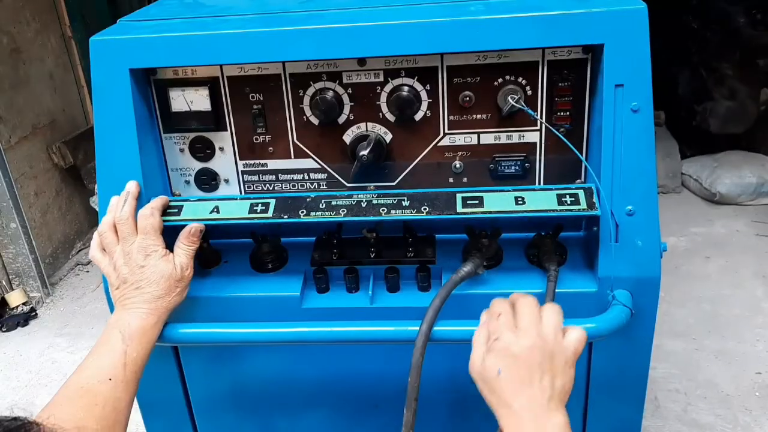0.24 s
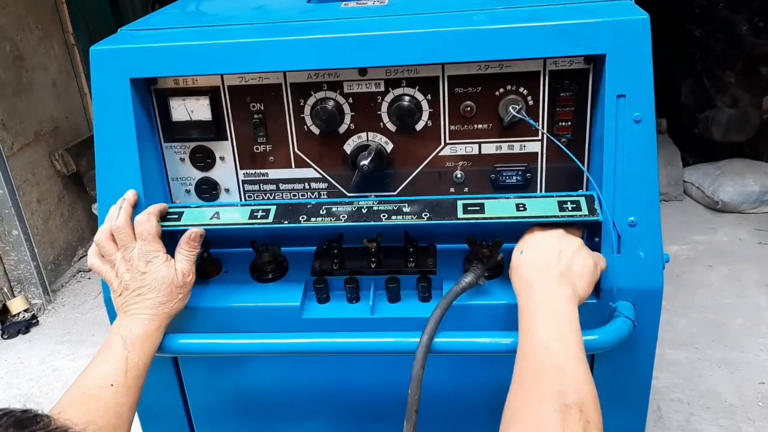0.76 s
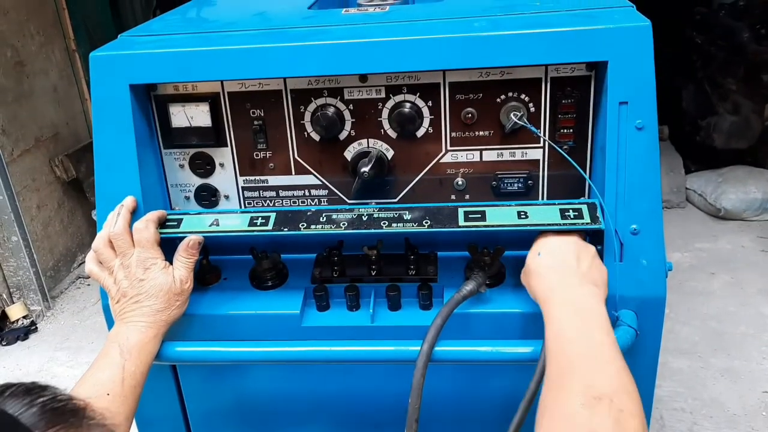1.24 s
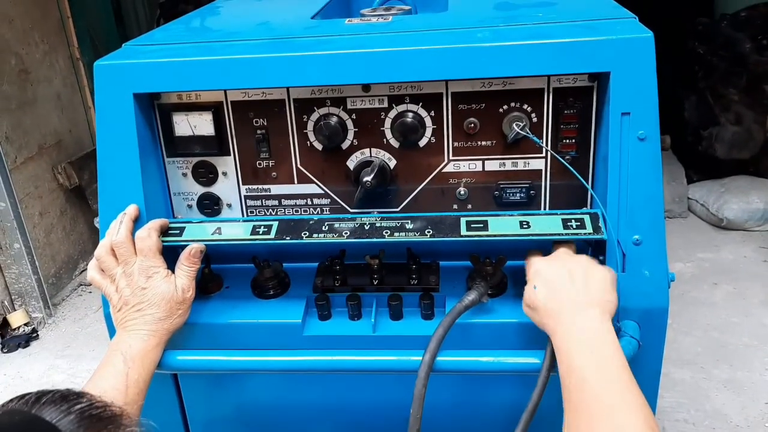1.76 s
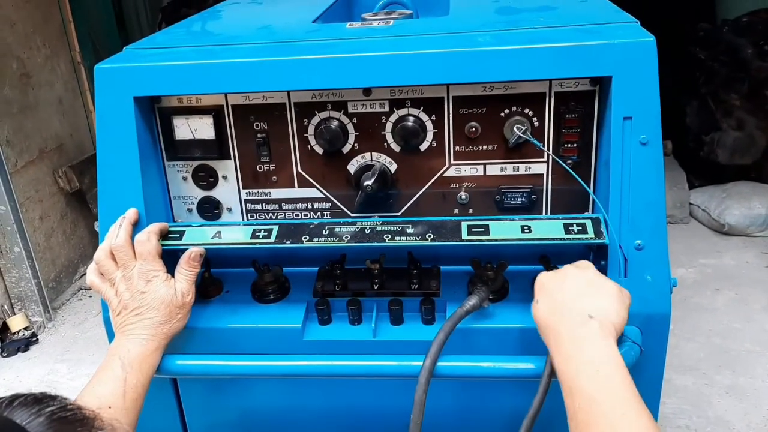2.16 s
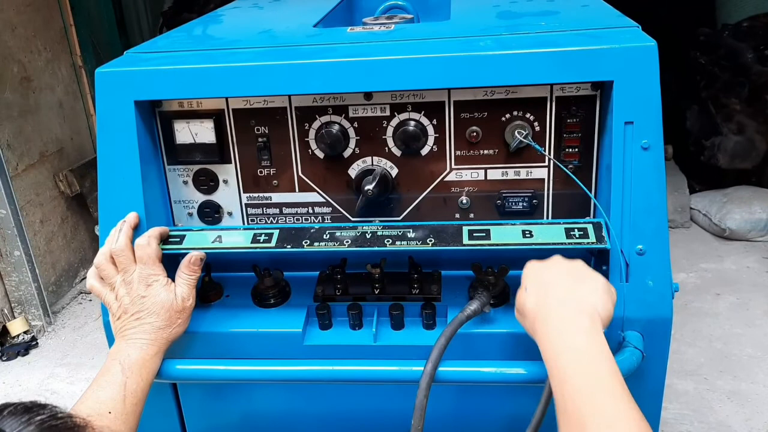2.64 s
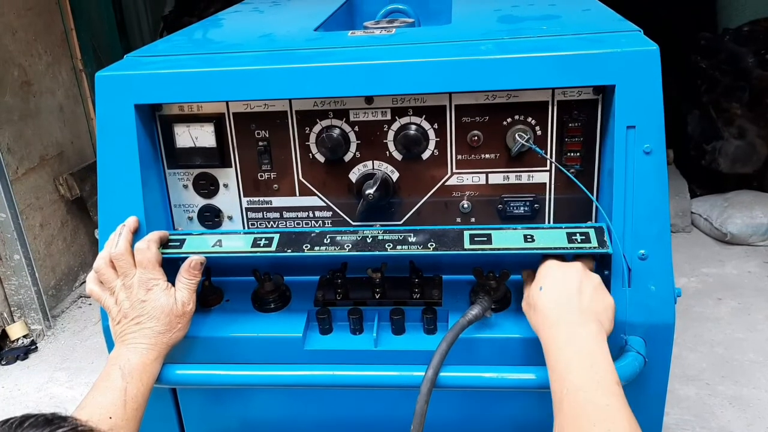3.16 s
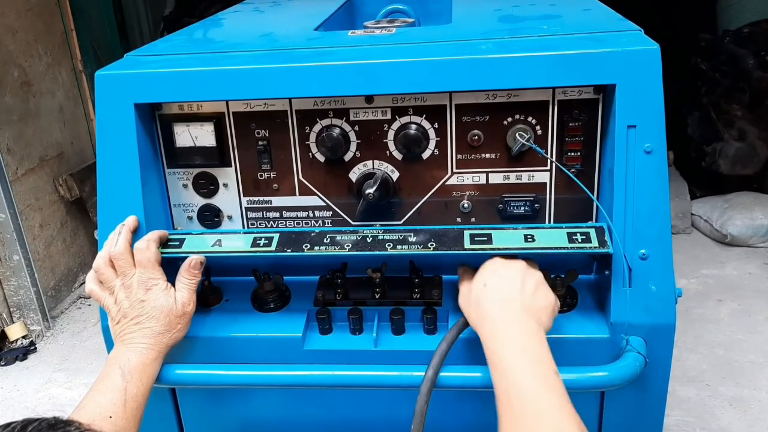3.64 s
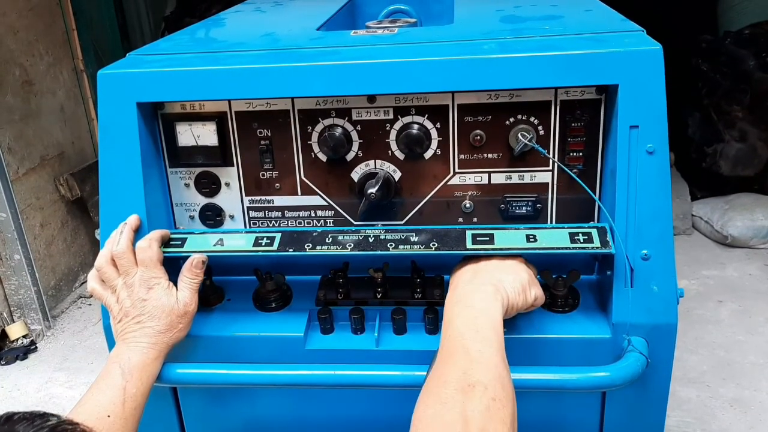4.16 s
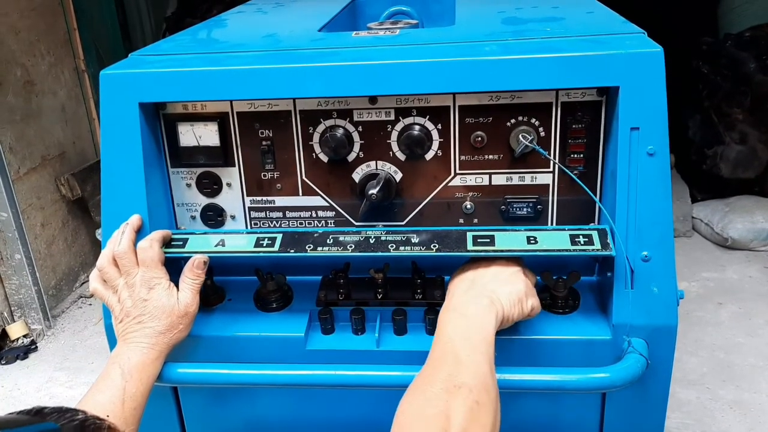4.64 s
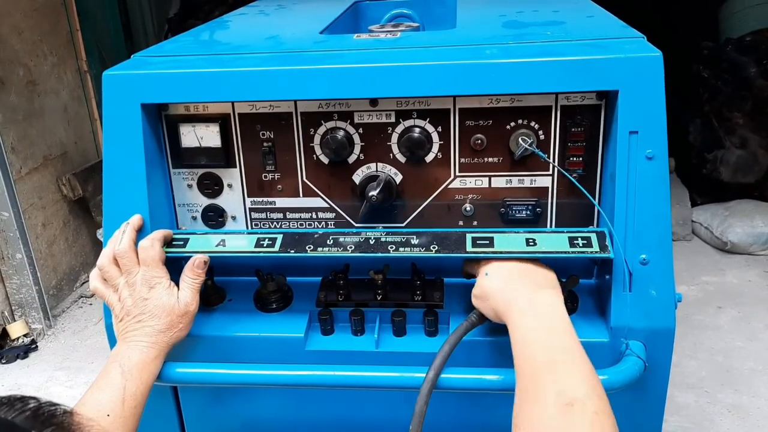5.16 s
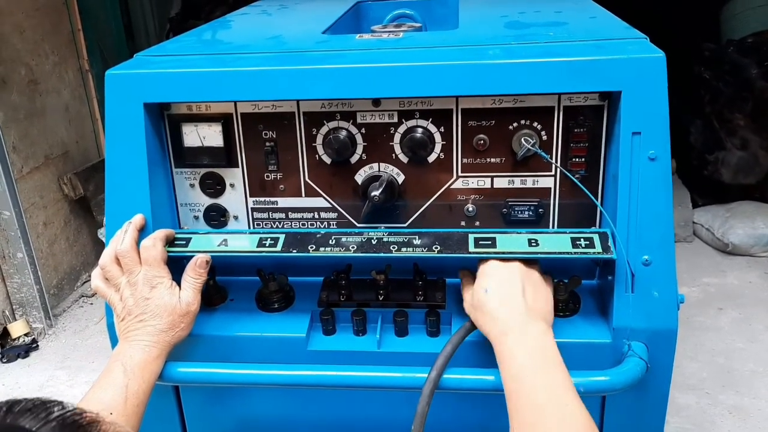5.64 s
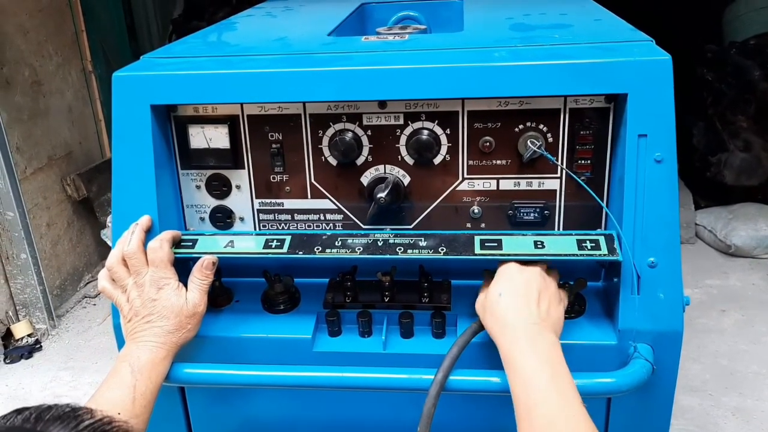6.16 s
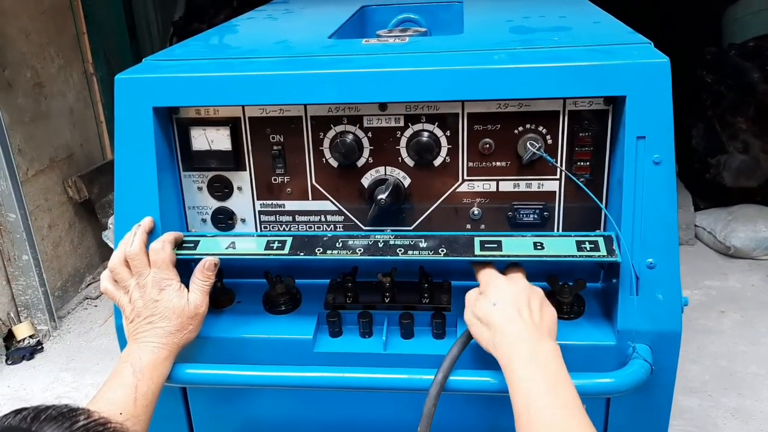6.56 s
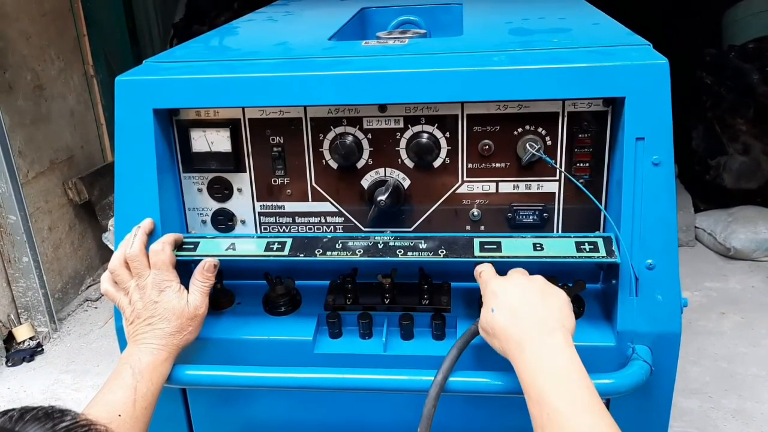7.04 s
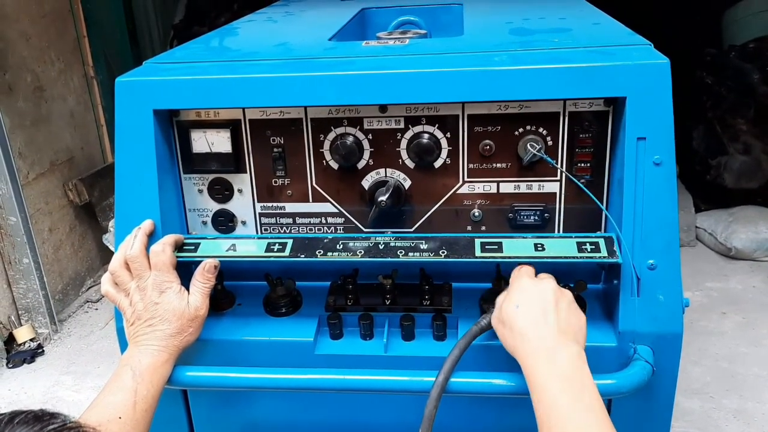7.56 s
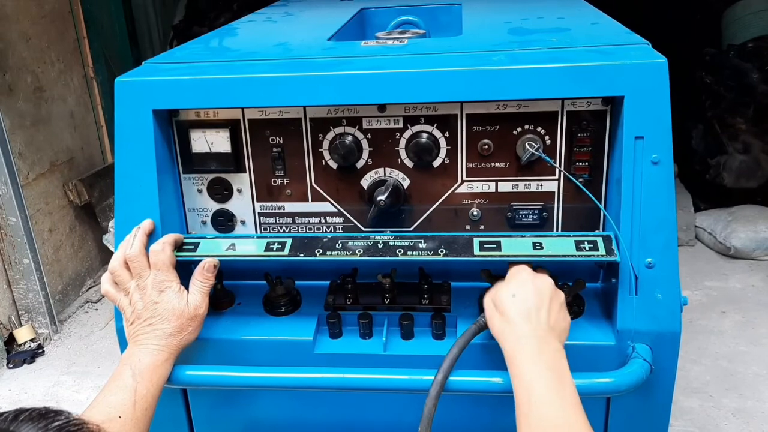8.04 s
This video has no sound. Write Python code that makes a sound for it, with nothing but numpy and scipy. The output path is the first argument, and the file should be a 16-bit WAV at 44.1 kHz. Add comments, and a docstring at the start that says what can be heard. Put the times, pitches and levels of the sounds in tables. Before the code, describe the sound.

A small three-cylinder diesel generator runs very close to a stereo microphone outdoors on a paved yard. It settles to its set speed within the first second, then holds an even drone with low rumble, fan hum, thin gear and alternator whines, busy knocking clatter and airy hiss. Short gritty scrapes and taps of cable terminals come and go, mostly after three seconds, and two soft low bumps touch the microphone past six.

```python
"""A three-cylinder diesel welder-generator runs close by from the start, reaching its governed speed in a second.
Sines on the engine's orders make the drone, fan hum and two whines; the alternator's swells at housing resonances.
Shaped noise makes rumble and airy hiss; cycle-locked vibration and knocks make panel noise and clatter.
The housing booms now and then; from 0.66 s a hand scrapes and taps the cable terminals in gritty noise bursts.
Past 6 s two soft low tones bump the microphone."""
import sys
import numpy as np
from scipy import signal
from scipy.fft import rfft, irfft
from scipy.io import wavfile

SR = 44100
rng = np.random.default_rng(int(sys.argv[2]) if len(sys.argv) > 2 else 0)


def wav_record(signal):
    """Record a signal, one row per channel, as 16-bit PCM in the file named by sys.argv[1]."""
    frames = np.transpose(np.atleast_2d(signal))
    bounded = np.clip(frames, -1, 1)
    # unit amplitude maps onto the largest positive 16-bit level
    quanta = np.round(bounded * 32767).astype(np.int16)
    wavfile.write(sys.argv[1], SR, quanta)


N = 366030
TIME = np.arange(N) / SR
FREQS = np.fft.rfftfreq(N, 1 / SR)
LEFT_LEAD_S = .00009  # the left channel hears the machine sooner


def amp(db):
    """Decibels to gain."""
    return 10 ** (np.asarray(db) / 20)


def unit(x):
    """Scales to rms 1."""
    return x / np.sqrt(np.mean(x ** 2) + 1e-20)


def read(points):
    """A curve at every frequency, joined on a log axis."""
    hz, value = np.transpose(points)
    return np.interp(np.log(FREQS + 1), np.log(hz + 1), value)


def pan(db):
    """Left and right gains for a level difference."""
    return amp(np.array([[.5], [-.5]]) * db) / np.sqrt((amp(db) ** 2 + amp(-db) ** 2) / 2)


def wander(rate_hz):
    """Slow random signal of rms about 1."""
    grid = np.linspace(0, TIME[-1], 2048)
    hz = np.fft.rfftfreq(len(grid), grid[1])
    lowpass = 1 / (1 + (hz / rate_hz) ** 2)
    slow = irfft(rfft(rng.standard_normal(len(grid))) * lowpass)
    return np.interp(TIME, grid, unit(slow))


def humps(rows):
    """Smooth rises and falls from rows of time, height and half length."""
    return sum(height * np.exp(-((TIME - s) / length) ** 2) for s, height, length in rows)


def peaks(modes, hz):
    """The dB that a table of modes adds at each frequency."""
    return sum(db / (1 + ((hz - f) / width) ** 2) for f, width, db in modes)


# Likeness of the two channels. Each row: frequency in Hz, correlation -1 to 1.
LIKENESS_HZ = [(50, .4), (120, .6), (170, .95), (250, 1.0), (500, .6), (800, .7), (1200, -.14), (2500, .12),
               (5000, .11), (15000, 0)]
# Balance of the two channels. Each row: frequency in Hz, left minus right in dB.
SIDES_HZ_DB = [(60, -5.5), (110, -5), (160, 1), (270, -0.6), (450, 3), (740, 10), (1220, 0), (1700, 4),
               (2050, -6), (2550, -2.5), (3000, -2), (3400, 0), (5500, 0), (9000, 7), (15000, 0)]


def colour(drive, gain):
    """Gives two white signals a spectrum and spreads them over the two microphones."""
    a, b = rfft(drive)
    same = np.clip(read(LIKENESS_HZ), -1, 1)
    mid = a * np.sqrt((1 + same) / 2)
    side = b * np.sqrt((1 - same) / 2)
    left = (mid + side) * np.exp(2j * np.pi * FREQS * LEFT_LEAD_S)
    channels = np.array([left, mid - side])
    return irfft(channels * gain * pan(read(SIDES_HZ_DB)), N) * np.sqrt(SR / 2)


# four-stroke cycles per second: set speed, and shortfall at the start
GOVERNED_HZ, START_SHORT_HZ, RUN_UP_S = 16.4764, .682, .9755


def run_up():
    """The speed-up still to come: 1 at the start, falling evenly to 0 after the run-up."""
    return np.maximum(1 - TIME / RUN_UP_S, 0)


# Brief drifts of the speed. Each row: centre in seconds, change in cycles per second, half length in seconds.
DRIFTS_HZ = [(1.204, -.061, .293), (1.85, .018, .15), (3.4, -.016, .15), (3.8, .02, .18), (4.3, -.025, .15),
             (4.8, .012, .15), (5.25, -.022, .18), (5.75, .008, .22), (6.3, -.035, .2), (7.62, .03, .18),
             (8.18, -.06, .17)]


def governor(tremble=0.00049):
    """Cycles per second: the speed climbs to its setting, then drifts and trembles around it."""
    steady = GOVERNED_HZ - START_SHORT_HZ * run_up() ** 2 + humps(DRIFTS_HZ)
    return steady * (1 + tremble * wander(11.3))


# Sharp housing resonances. Each row: centre in Hz, half width in Hz, gain at the centre in dB.
HOUSING_MODES = [(495, 8, 7), (721, 14, 5), (754, 13, 5.3), (824, 9, 4.5), (903, 10, 10), (1218, 14, 3),
                 (1890, 8, 4), (1914, 6, 7.5)]


def resonance_db(order, speed):
    """An engine order swells while its pitch lies on a housing resonance."""
    near = [row for row in HOUSING_MODES if abs(order * GOVERNED_HZ - row[0]) < 50]
    return sum(db * np.exp(-((order * speed - hz) / width) ** 2) for hz, width, db in near)


# Strong engine orders. Each row: multiple of the cycle rate, relative level in dB, left minus right in dB.
DRONE_ORDERS = [(3, -35, 1), (4, -49, 0), (6, -26, 1.3), (8, -51, 3), (9, -42, 2), (10, -42, 1),
                (11, -40, 2), (12, -44, 1), (13, -43, 1), (15, -37, 3), (16, -37, 2), (17, -42, 1),
                (18, -37.3, 1), (19, -38.7, 0), (20, -41, 1), (21, -32.5, 6), (22, -36.3, 2), (23, -41, -4),
                (24, -35, 3), (25, -36.5, 3), (26, -41, 5), (27, -43, 5), (28, -46, 3), (29, -44, 2),
                (30, -49, 5), (31, -45, 0), (32, -41, 5), (33, -63, -4), (34, -45, 9), (35, -40.5, 6),
                (36, -50, 3), (37, -36, 4), (38, -53, 8), (39, -60, 12), (40, -46, 6), (41, -49, 4),
                (42, -49, 2), (43, -52, 3), (44, -44, 5), (45, -48, 8), (46, -48.7, 4), (47, -49, 4),
                (48, -52, 9), (49, -55, -12), (50, -49, 2), (51, -50, -3), (52, -61, 3), (53, -54, 1),
                (54, -52, 12), (55, -67, 12), (56, -52, -1), (57, -60, -8), (58, -60, -3), (60, -54, 0),
                (62, -57, 1), (64, -55, -7), (70, -57, 0), (75, -57, 1), (76, -52, 5), (78, -58, -3),
                (81, -58, 0), (91, -59, 4), (93, -58, 4), (96, -60, 0), (121, -54, -10), (129, -56, 0),
                (135, -54, -10)]


def drone(turns, speed, unsteady=0.078, firing_unsteady=0.012, fuel_db=3.5, body_db=-0.42, slow_db=1):
    """Sine engine orders: the lowest are steadiest and grow with fuel, the rest swell at resonances."""
    out = np.zeros((2, N))
    fuel = amp(fuel_db * run_up())
    slow_loss_db = slow_db * run_up()
    lead_turns = np.array([[LEFT_LEAD_S], [0]]) * GOVERNED_HZ
    angle = 2 * np.pi * ((turns + lead_turns) % 1).astype(np.float32)
    for k, db, side_db in DRONE_ORDERS:
        if k < 7:
            level = fuel * (1 + firing_unsteady * wander(6))
        else:
            body = amp(body_db - slow_loss_db + resonance_db(k, speed))
            level = body * (1 + unsteady * wander(4))
        # muffler and housing delay each order differently: firings smear into an even drone
        lag_rad = .29 * np.pi * k ** 2
        out += pan(side_db) * amp(db) * level * np.sqrt(2) * np.sin(k * angle - lag_rad)
    return out


def fan(turns, order=12.27, level_db=-27):
    """The belt-driven fan hums off the engine's whole orders, its phase and level wandering."""
    phase_rad = 0.25 * wander(0.73)
    hum = np.sin(order * 2 * np.pi * turns + phase_rad)
    return amp(level_db) * (1 + 0.025 * wander(10)) * hum * pan(0.29)


# Gear standing wave shifting across the microphones. Each row: time in seconds, level in dB,
# left minus right in dB, phase of left against right in rad.
GEAR_WAVE_S = [(.2, -39, 3, 1.5), (.42, -46, 1, 3.1), (.8, -41, 4, 3.6), (1.3, -41, 9, 3.8),
               (1.7, -38, 0, 3.4), (2.1, -40, -3, 3.6), (2.6, -38, 1, 3.35), (3.6, -38, 0, 3.4),
               (4.3, -41, 1, 3.3), (4.7, -39, -3, 3.7), (5.2, -40, 2, 3.3), (5.6, -37, -3, 3.7),
               (6.3, -37, 3, 2.9), (7.1, -39, 0, 3), (7.5, -38, -8, 3.5), (7.8, -38, -4, 3.7),
               (8.2, -38, 6, 2.9)]


def gear_whine(turns, order=68):
    """Gears whine on an engine order; level, balance and phase follow the standing wave."""
    s, *columns = np.transpose(GEAR_WAVE_S)
    db, side_db, apart_rad = (np.interp(TIME, s, column) for column in columns)
    angle = order * 2 * np.pi * turns
    return amp(db) * pan(side_db) * np.array([np.sin(angle + apart_rad), np.sin(angle)])


def alternator_whine(turns, speed, order=116, base_db=-50, slow_db_per_hz=10, waver_db=1.4):
    """An engine order grows with speed, swells where its pitch meets a resonance, and wavers."""
    level_db = base_db + resonance_db(order, speed) - slow_db_per_hz * (GOVERNED_HZ - speed)
    tone = np.sin(order * 2 * np.pi * turns + 0.24 * wander(2.9))
    return amp(level_db + waver_db * wander(2.1)) * tone


def repeating(turns, orders=512, size=16384):
    """A white vibration that recurs every cycle: random-phase weak orders between the strong ones."""
    lines = np.exp(2j * np.pi * rng.random((2, orders)))
    lines[:, [row[0] for row in DRONE_ORDERS]] = 0
    pattern = unit(irfft(lines, size)) * np.sqrt(orders * GOVERNED_HZ / (SR / 2))
    return np.array([np.interp(turns % 1 * size, np.arange(size), p) for p in pattern])


# The panels' answer to each engine cycle. Each row: frequency in Hz, level in dB per Hz.
PANELS_HZ_DB = [(120, -74), (550, -58), (850, -69.5), (1250, -81.5), (1420, -99), (1550, -67.5),
                (2000, -113), (3000, -102)]


def panels(turns):
    """Housing panels shake alike in every engine cycle."""
    return colour(repeating(turns), amp(read(PANELS_HZ_DB)))


# Cooling air and exhaust turbulence. Each row: frequency in Hz, relative density in dB.
RUMBLE_HZ_DB = [(28, -80), (62, -59.5), (110, -58.5), (132, -61), (188, -53.5), (232, -55.5), (278, -56),
                (318, -47), (362, -54), (412, -55), (470, -66.5), (580, -62.5), (665, -59), (780, -68),
                (900, -74.5), (1440, -74.5), (3000, -101)]
# Air resonances of the housing. Each row: centre in Hz, half width in Hz, relative density in dB.
CAVITY_HZ_DB = [(147.8, 1.9, -41.5), (170.6, 5.9, -43)]
# Brief swells of the rumble. Each row: centre in seconds, rise in dB, half length in seconds.
SWELLS_S_DB = [(.1, 0.5, 0.18), (.38, 2, 0.13), (1.9, 1.5, 0.95), (4.25, 2.2, 0.62)]


def rumble(turns, throb=0.12, crank_throb=0.32, level_db=1):
    """Turbulence, pulsed by three firings and two crank turns a cycle, booms in the housing."""
    gain = amp(read(RUMBLE_HZ_DB))
    for hz, width, db in CAVITY_HZ_DB:
        gain = np.hypot(gain, amp(db) / (1 + ((FREQS - hz) / width) ** 2))
    firing = np.cos(2 * np.pi * 3 * turns)
    crank = np.cos(2 * np.pi * 2 * turns)
    pulse = 1 + throb * firing + crank_throb * crank
    turbulence = unit(rng.standard_normal((2, N)) * pulse)
    return colour(turbulence, gain) * amp(level_db + humps(SWELLS_S_DB))


# Injector and valve knocks. Each row: place in the cycle 0-1, relative force in dB, ringing pitch in Hz.
KNOCKS_CYCLE = [(.045, 1, 2000), (.07, -1, 2700), (.195, 2, 2000), (.24, 1, 2700), (.27, 1, 2450),
                (.3, 1, 2750), (.33, 0, 2500), (.36, 1, 2600), (.53, 0, 2200), (.59, 2.5, 2300),
                (.63, 2, 2100), (.675, 2.5, 2700), (.725, -1, 2600), (.77, -1, 1950), (.805, -1, 2000),
                (.915, -2, 2500), (.985, 4.5, 2300)]
# The block's answer to a knock. Each row: frequency in Hz, relative response in dB.
BLOCK_HZ_DB = [(300, -65.5), (900, -64.5), (1400, -81), (1750, -72.5), (2000, -67.5), (2300, -70.5),
               (2600, -68), (2850, -71.5), (3200, -76.5), (4000, -87), (7000, -99), (15000, -106)]
# The block's sharper modes. Each row: centre in Hz, half width in Hz, added dB.
BLOCK_MODES_HZ = [(1994, 7.5, 7.5), (2106, 17, 4), (2255, 13, 3), (2272, 15, 7.5), (2363, 21, -0.5),
                  (2490, 25, 2.5), (2586, 9.4, 8), (2747, 12, 4), (3010, 17, 8), (3096, 18, 4)]
# Moments of harder clatter. Each row: centre in seconds, rise in dB, half length in seconds.
HARDER_S_DB = [(1.08, 0, .12), (2.1, 0.5, 0.062), (4.75, 1, 0.23), (6.65, 2.5, 0.035), (7.4, 1, 0.22)]


def clatter(turns, ring=1.0, rattle=0.28, alike=.42, uneven_db=0.4, firing_swell=0.1, crank_swell=0.073,
            knock_s=.0008, knock_db=-8, level_db=-1, burst_db=1.4, burst_hz=22):
    """Knocks at fixed crank angles ping the block, over its lingering ring and a loose rattle."""
    firing = np.cos(2 * np.pi * 3 * turns)
    crank = np.sin(2 * np.pi * 2 * turns)
    swell = 1 + firing_swell * firing + crank_swell * crank
    power = ring ** 2 * np.maximum(swell, 0)
    pings = np.zeros((2, N))
    for place, db, hz in KNOCKS_CYCLE:
        cycle, since = np.divmod(turns - place + 1, 1)
        age_s = (since / GOVERNED_HZ).astype(np.float32)
        uneven = uneven_db * rng.standard_normal(int(cycle[-1]) + 1)
        force = amp(db + uneven)[cycle.astype(int)]
        # builds to its peak at knock_s, then dies
        stroke = force * age_s / knock_s * np.exp(1 - np.minimum(age_s / knock_s, 20))
        pings += stroke * np.sin(2 * np.pi * (hz * age_s + rng.random((2, 1), np.float32)))
        power += (rattle * stroke) ** 2
    share = np.clip(alike, 0, 1)  # part that recurs each cycle
    grain = np.sqrt(share) * repeating(turns) + np.sqrt(1 - share) * rng.standard_normal((2, N))
    drive = grain * np.sqrt(power) + amp(knock_db) * pings
    block = amp(read(BLOCK_HZ_DB) + peaks(BLOCK_MODES_HZ, FREQS))
    # combustion differs between firings, so neighbouring knocks swell together
    bursts_db = burst_db * wander(burst_hz)
    return colour(drive, block) * amp(level_db + bursts_db + humps(HARDER_S_DB))


# Broad spectrum of the hiss. Each row: frequency in Hz, relative density in dB.
HISS_HZ_DB = [(1000, -106), (3200, -79.5), (4200, -86), (5200, -87.5), (7000, -90.5), (8000, -93.5),
              (9400, -98.5), (11000, -96), (15000, -113.5)]
# Narrow peaks in the hiss. Each row: centre in Hz, half width in Hz, added dB.
HISS_PEAKS_HZ = [(4255, 15, 10.5), (4950, 60, 6), (6020, 33, 7.5), (6970, 90, 5.5), (11200, 160, 3),
                 (13200, 180, 8)]


def hiss(flutter_db=1.0):
    """Airy hiss flutters, with narrow tonal peaks: shaped noise of wandering level."""
    gain = amp(read(HISS_HZ_DB) + peaks(HISS_PEAKS_HZ, FREQS))
    return colour(rng.standard_normal((2, N)), gain) * amp(flutter_db * wander(30))


def swelling_tones(rows):
    """Short sines that swell and die smoothly."""
    out = np.zeros(N)
    for s, hz, db, width_s in rows:
        since = TIME - s
        out += amp(db) * np.exp(-(since / width_s) ** 2) * np.sin(2 * np.pi * hz * since)
    return out


# Housing resonances booming. Each row: centre in seconds, pitch in Hz, relative peak in dB, half length in seconds.
BOOMS_S_HZ = [(.365, 330, -18, 0.022), (.73, 167, -22.5, 0.073), (1.29, 169, -24, 0.055),
              (1.8, 172.2, -23, 0.17), (1.97, 525, -34, .035), (2.03, 294.4, -18.5, 0.055),
              (2.81, 555, -30, 0.034), (3.0, 172.8, -23.5, 0.25), (4.74, 693, -29, 0.021),
              (4.45, 174, -36, 0.16), (5.6, 154, -26.5, 0.18), (6.73, 173.5, -19, 0.13)]


def booms():
    """The housing booms briefly at one of its resonances, more to the left."""
    return swelling_tones(BOOMS_S_HZ) * pan(2.2)


# Metal and rubber under the hand. Each row: frequency in Hz, relative density in dB.
SCRAPE_HZ_DB = [(500, -99), (2000, -73.5), (4500, -82), (8000, -86), (11000, -89.5), (14500, -90)]
# The rubbed cable lug's ring. Each row: centre in Hz, half width in Hz, dB added at full ring.
LUG_HZ_DB = [(3750, 200, 10), (4300, 300, 13), (5100, 260, 13)]
# The hand's moves. Each row: start in seconds, relative level in dB, decay in seconds,
# brightness in dB per octave, lug ring 0-1.
SCRAPES_S = [(.66, -2, .023, 1, 0), (2.64, -6, .02, -1, 0), (2.70, 0, .025, -4, .3), (2.89, 0, .04, -1, .1),
             (3.187, 2.5, .03, 1, 0), (3.198, 7, .006, -11, 0), (3.246, 5, .025, 3, 0),
             (4.181, -3, .03, -5, .6), (4.263, 4, .008, 0, .3), (4.368, 1.5, .04, -1.5, .8),
             (4.511, 6.5, .008, -2, 0), (5.09, 0, .007, 2, 0), (5.312, 5, .012, -10, .1),
             (5.39, -5, .012, 3, 0), (5.69, -3, .04, -3, .4), (5.885, 2, .035, -3, .45),
             (6.64, 3, .012, -5, .3), (7.25, 0, .036, -4, .5), (7.445, 2, .038, -3, .45),
             (7.86, -1, .007, 2, 0), (8.26, 1, .015, -3, .5)]


def scrapes(pivot_hz=5000, attack_share=0.26, size=16384):
    """Gritty noise bursts: rubs and taps of terminal nut and cable lug."""
    out = np.zeros((2, N + size))
    t = np.arange(size) / SR
    hz = np.fft.rfftfreq(size, 1 / SR)
    body_db = np.interp(hz, FREQS, read(SCRAPE_HZ_DB))
    lug_db = peaks(LUG_HZ_DB, hz)
    octaves = np.log2(np.maximum(hz, 1000) / pivot_hz)
    for s, db, decay, bright_db, ring in SCRAPES_S:
        grit = rng.standard_normal((2, size)) * amp(1.5 * rng.standard_normal(size))
        rub = grit * np.exp(-t / decay) * (1 - np.exp(-t / (attack_share * decay)))
        gain = amp(db + body_db + bright_db * octaves + np.clip(ring, 0, 1) * lug_db)
        start = round(s * SR)
        out[:, start:start + size] += irfft(rfft(rub) * gain) * np.sqrt(SR / 2)
    return out[:, :N]


# Soft bumps. Each row: centre in seconds, pitch in Hz, peak level in dB, half length in seconds.
BUMPS_S_HZ = [(6.29, 61.4, -28, 0.039), (6.35, 113, -26, 0.032)]


def bumps():
    """Soft bumps against the microphone: dull low tones, equal on both sides."""
    return swelling_tones(BUMPS_S_HZ)


def scene():
    """One crankshaft, never quite even, drives the engine-locked layers; air and hand join them."""
    speed = governor()
    turns = np.cumsum(speed) / SR  # engine cycles so far
    whirr = fan(turns) + gear_whine(turns) + alternator_whine(turns, speed)
    machine = drone(turns, speed) + whirr + panels(turns) + rumble(turns) + clatter(turns) + hiss()
    return machine + booms() + scrapes() + bumps()


def record(dry, edge_hz=15400):
    """Silent for 24 ms, then a 7 ms fade-in; a steep low-pass limits the band."""
    opened = np.clip((TIME - .024) / .007, 0, 1)
    lowpass = signal.firwin(511, edge_hz, window=("kaiser", 9), fs=SR)
    return signal.oaconvolve(dry * opened, lowpass[None], "same")


dry = scene()
out = record(dry)
wav_record(out)
```